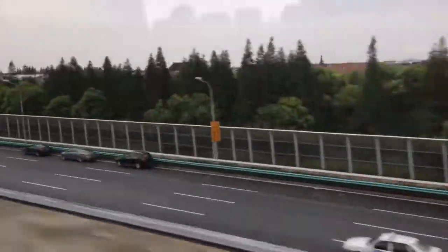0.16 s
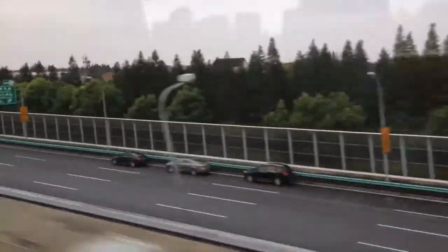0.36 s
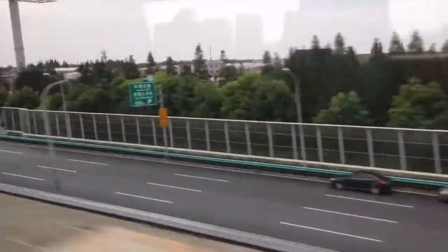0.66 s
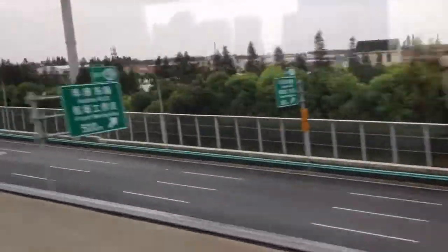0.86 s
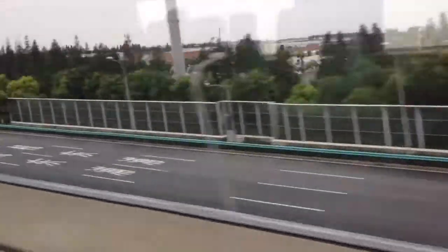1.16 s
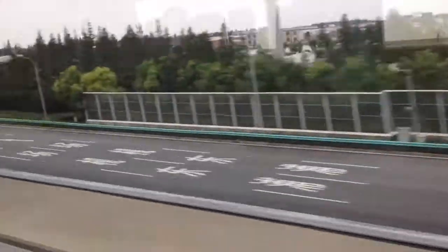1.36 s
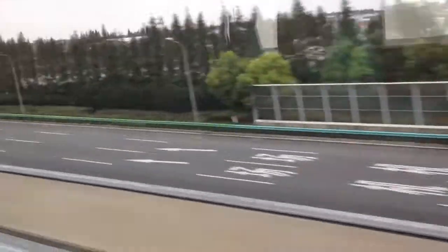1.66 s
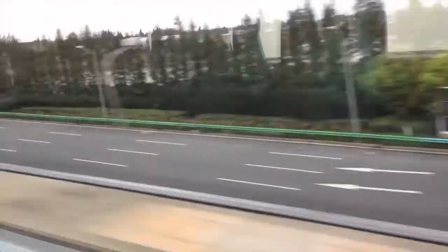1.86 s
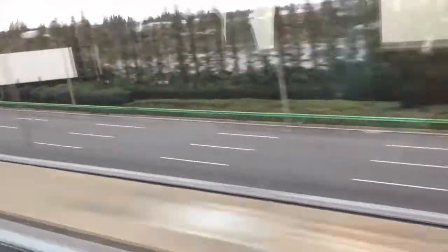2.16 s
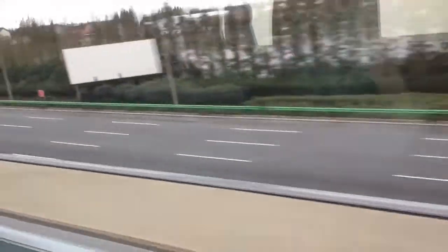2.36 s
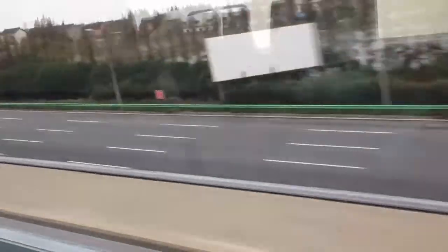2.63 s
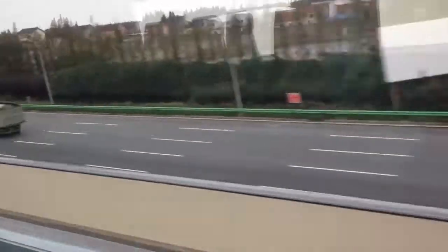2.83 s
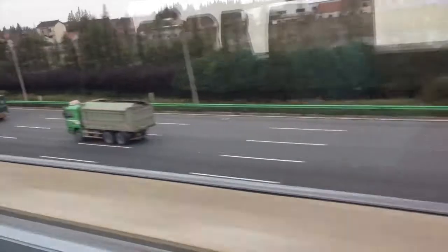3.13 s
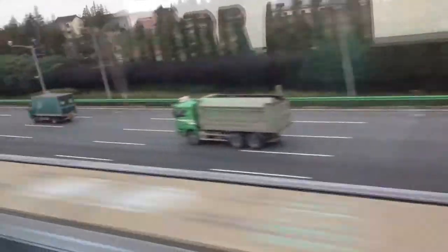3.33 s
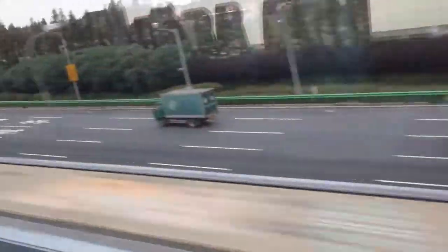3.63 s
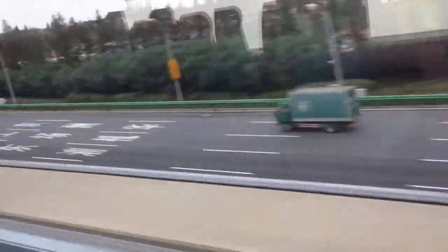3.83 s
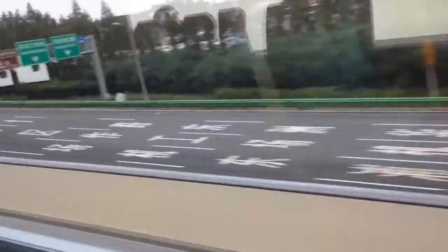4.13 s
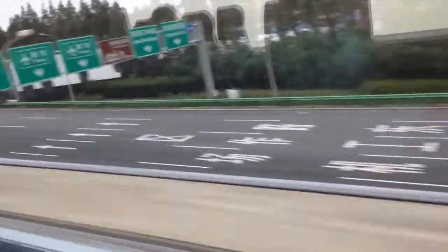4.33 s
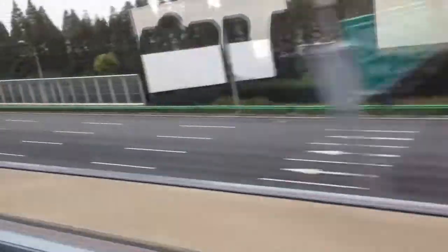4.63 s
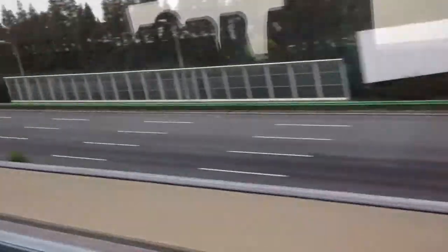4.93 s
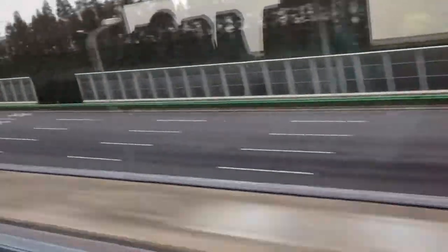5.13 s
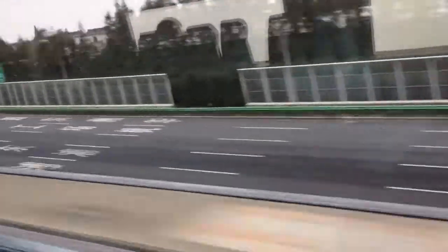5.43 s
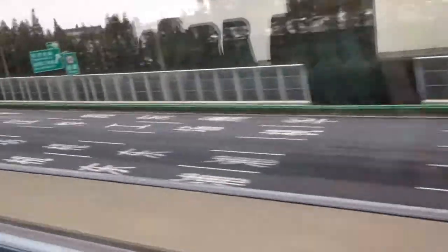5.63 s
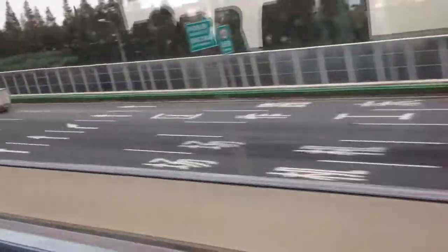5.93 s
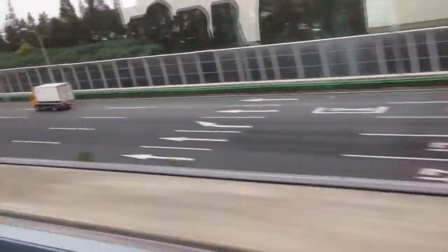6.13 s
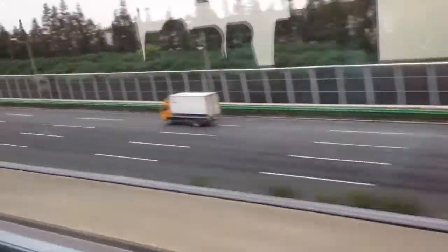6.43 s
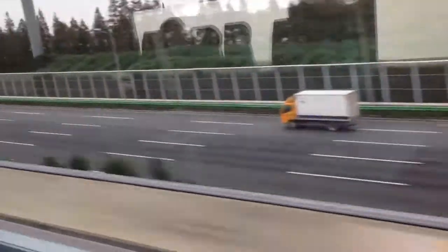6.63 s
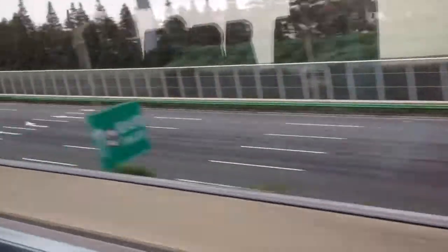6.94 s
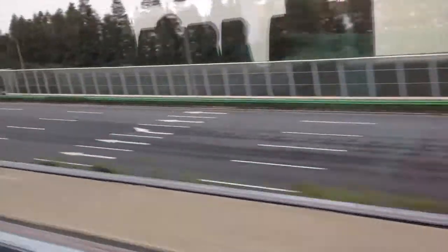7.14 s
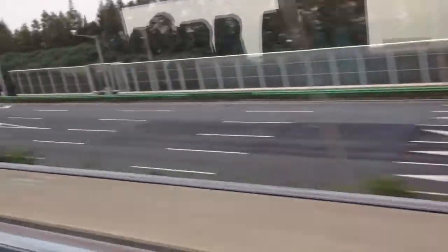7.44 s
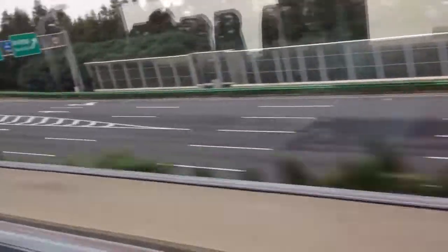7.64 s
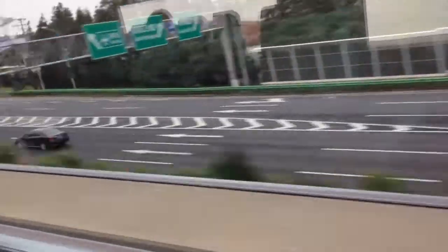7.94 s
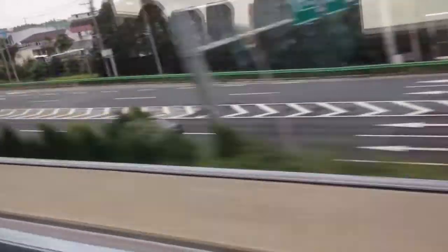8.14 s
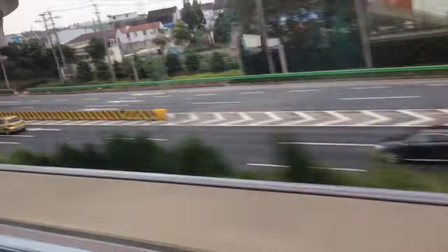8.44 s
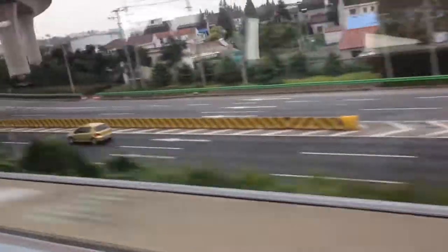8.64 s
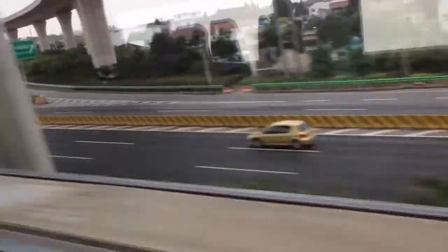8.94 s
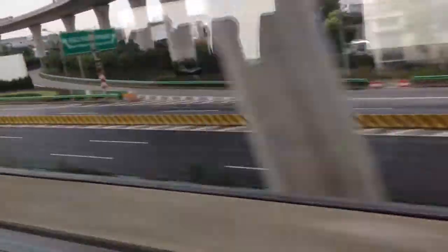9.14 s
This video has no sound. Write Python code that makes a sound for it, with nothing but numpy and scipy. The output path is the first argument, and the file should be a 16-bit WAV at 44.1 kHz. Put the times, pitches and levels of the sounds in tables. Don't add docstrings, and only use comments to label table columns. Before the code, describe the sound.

Inside a fast maglev train cabin, a deep lumpy rumble with soft thudding jolts, a dull rush of air and a faint wavering magnetic whine.

```python
import sys
import numpy as np
from scipy import signal
from scipy.fft import irfft, next_fast_len
from scipy.io import wavfile
from scipy.ndimage import uniform_filter1d

SR = 44100
rng = np.random.default_rng(int(sys.argv[2]) if len(sys.argv) > 2 else 0)


def pcm_store(signal):
    levels = np.round(np.clip(np.atleast_2d(signal), -1, 1) * 32767)
    wavfile.write(sys.argv[1], SR, levels.astype(np.int16).T)


def volts_from_decibels(level):
    exponent = np.asarray(level, float) / 20
    return 10 ** exponent


N = 409688
TIME = np.arange(N) / SR


def evened(x):
    return x / np.sqrt(np.mean(x ** 2) + 1e-20)


def add(mix, s, sound):
    part = mix[max(round(s * SR), 0):][:len(sound)]
    part += sound[:len(part)]


def bump(s, length):
    out = np.zeros(N)
    first = max(round((s - 1.5 * length) * SR), 0)
    last = max(round((s + 1.5 * length) * SR), 1)
    out[first:last] = np.exp(-(2 * (TIME[first:last] - s) / length) ** 2)
    return out


def noise(points, lo_hz, hi_hz, patchy_db, size=2048):
    hz = np.fft.rfftfreq(size, 1 / SR)
    a, b, patches = rng.standard_normal((4 * N // size + 5, len(hz), 3), dtype=np.float32).T
    patches = uniform_filter1d(patches, size=20, axis=0)
    patches = evened(uniform_filter1d(patches, size=8, axis=1))
    f, db = np.transpose(points)
    shape = volts_from_decibels(np.interp(np.log(hz + 1), np.log(f + 1), db))
    edges = np.sqrt(1 / (1 + (lo_hz / (hz + 1)) ** 8) / (1 + (hz / hi_hz) ** 8))
    z = (a + 1j * b) * (shape * edges)[:, None] * volts_from_decibels(patchy_db * patches)
    return evened(signal.istft(z, nperseg=size, noverlap=3 * size // 4)[1][:N])


def band(length, *modes):
    size = next_fast_len(length)
    f = np.fft.rfftfreq(size, 1 / SR)
    power = sum(volts_from_decibels(2 * db) / width / (1 + (2 * (f - hz) / width) ** 2) ** 2 for hz, width, db in modes)
    z = np.sqrt(power) * (rng.standard_normal((len(f), 2)) @ [1, 1j])
    rms = np.sqrt(sum(volts_from_decibels(2 * db) for hz, width, db in modes))
    return evened(irfft(z, size)[:length]) * rms


def steadied(x, seconds, share):
    width = round(seconds * SR)
    power = uniform_filter1d(uniform_filter1d(x ** 2, width), width)
    return evened(x / (abs(power) + 1e-3) ** (share / 2))


def self_noise():
    return band(N, (13500, 9000, -80))


# time in seconds, peak level in dB.
FITTING_TICKS = [(0.193, -54), (1.614, -54), (1.716, -57), (2.174, -57), (2.316, -51), (3.102, -52),
                 (4.436, -51), (5.157, -58), (5.221, -56), (5.313, -48.5), (5.907, -52.5), (6.087, -54),
                 (6.119, -62), (7.039, -62), (7.343, -55), (8.149, -55), (9.193, -54)]


def ticks():
    out, t = np.zeros(N), TIME[:6000]
    t60_s, rise_s = 0.1, 0.006
    for s, db in FITTING_TICKS:
        fade = volts_from_decibels(db - 8.5 - 60 * t / t60_s) * np.minimum(t / rise_s, 1)
        add(out, s, fade * band(len(t), (5000, 12000, 0)))
    return out


# middle in seconds, length in seconds, level in dB rms, centre in Hz, width in Hz.
CLOTH_RUSTLES = [(0.646, .4, -71, 4970, 2990), (1.653, .3, -76, 7960, 6000), (3.198, .2, -80, 8050, 4000),
                 (3.995, .045, -63, 4760, 2000), (5.228, .08, -71, 6500, 5000),
                 (5.844, .2, -65, 3780, 1200), (6.11, 0.065, -69, 5500, 6000),
                 (6.868, .012, -58, 3900, 700), (6.91, .12, -65, 4200, 1800), (6.894, .07, -73, 8000, 2980),
                 (7.06, .12, -68, 6500, 2200), (8.143, .07, -62.5, 5000, 3000),
                 (8.158, .06, -73, 9570, 7000), (9.195, .08, -71.5, 7060, 3000)]


def rustles():
    out = np.zeros(N)
    for s, length, db, hz, width in CLOTH_RUSTLES:
        count = round(2 * length * SR)
        wander = evened(uniform_filter1d(rng.standard_normal(SR), size=200))[:count]
        grain = evened(volts_from_decibels(3.2 * wander))
        swell = volts_from_decibels(db) * np.hanning(count)
        add(out, s - length, swell * grain * band(SR, (hz, width, 0))[:count])
    return out


PASS_HZ = 26.976
# multiple of PASS_HZ, level in dB rms.
TOOTH_TONES = [(3, -38.2), (6, -43.4), (13, -62.5), (14, -60.3), (15, -54.8), (16, -63.2), (19, -65.4),
               (21, -61.7), (25, -69.5), (26, -70.3), (27, -66.3), (28, -69.9), (30, -73.1), (31, -74.9),
               (32, -75.0), (33, -70.6), (34, -76.6), (39, -74.1), (42, -71.1), (45, -67.6), (46, -77.4),
               (47, -78.9), (48, -77.9), (49, -77.2), (51, -72.5), (55, -79.2), (63, -80.2), (108, -82.2)]


def tooth_comb():
    out, coarse = np.zeros(N), TIME[::1000]
    for k, db in TOOTH_TONES:
        start, slow, place = rng.random(3)
        sway_hz = 0.3 * slow + 0.15
        sway = volts_from_decibels(db + 2.0 * np.sin(2 * np.pi * (sway_hz * coarse + place)))
        level = np.interp(TIME, coarse, np.sqrt(2) * sway)
        out += level * np.sin(2 * np.pi * (k * PASS_HZ * TIME + start))
    return out


WHINE_TONES = (24, 36, 54, 72)
WHINE_QUIET_DB = (-66, -64, -70.5, -75.5)
# middle in seconds, length in seconds, lift in dB.
WHINE_LIFTS = [
    [(.7, 1.8, 11), (1.85, 0.59, 13.5), (5.2, .4, 9.5), (6.0, 0.45, 10.5), (7.5, .8, 7.5), (8.9, 0.86, 10)],
    [(.55, 0.62, 9.5), (1.05, 0.82, 13.5), (1.8, 0.65, 7), (3.5, 0.65, 6), (4.7, 0.36, 8), (6.3, .3, 5), (8.0, .5, 9.5), (8.8, 0.34, 6)],
    [(0.0, 0.49, 7.5), (.75, 0.45, 9), (2.7, 1.4, 7.5), (4.0, 1.25, 9), (5.3, 0.79, 4), (6.8, .5, 11.5), (7.65, .5, 9), (8.6, 1.3, 11.5)],
    [(.6, 0.99, 14), (2.45, .8, 10), (3.5, 0.71, 7.5), (4.8, .4, 11), (5.4, 0.96, 11.5), (7.55, .4, 9.5), (8.5, .8, 9)],
]
# noisy share from 0 to 1, width in Hz.
WHINE_SPREAD = ((0.25, 5.9), (0.2, 13), (0.1, 6.0), (.4, 16))


def whine():
    out = np.zeros(N)
    for k, rest_db, swells, (share, width_hz) in zip(WHINE_TONES, WHINE_QUIET_DB, WHINE_LIFTS, WHINE_SPREAD):
        db = rest_db + sum(lift_db * bump(s, length) for s, length, lift_db in swells)
        tone = np.sqrt(2) * np.sin(2 * np.pi * (k * PASS_HZ * TIME + rng.random()))
        blur = band(N, (k * PASS_HZ, width_hz, 0))
        out += volts_from_decibels(db) * (np.sqrt(1 - share) * tone + np.sqrt(share) * blur)
    return out


# time in seconds, drop in dB, recovery in seconds.
GAIN_DROPS = [(2.05, -3, 1.2), (3.3, -0.2, .7), (6.41, -1.5, 1.4), (7.5, -.7, 0.54), (8.35, -0.5, .5)]


def ducking():
    out, fall_s = np.zeros(N), 0.045
    for s, db, recovery in GAIN_DROPS:
        since = np.maximum(TIME - s, 0)
        out += db * (1 - np.exp(-since / fall_s)) * np.exp(-since / recovery)
    return out


# pitch in Hz, level in dB per Hz.
ROAR_COLOUR = [(120, -36), (200, 0.5), (251, -6.5), (338, -10.5), (431, -18), (628, -20.5), (834, -27.5),
               (980, -24.5), (1120, -29), (1430, -31), (1610, -34), (1920, -37), (2080, -37), (3430, -41),
               (5000, -54.5), (6500, -80.5), (11000, -120)]
# pitch in Hz, level in dB per Hz.
HISS_COLOUR = [(2060, -30.5), (3500, 0.5), (8240, -18), (14700, -25), (15600, -24.5)]
# pitch in Hz, width in Hz, level in dB rms.
RINGING_BANDS = [(600, 60, -60), (968, 90, -60.5), (1442, 63, -63.5), (1930, 21, -69.5), (2180, 8, -80),
                 (2423, 110, -70), (2710, 90, -73), (2904, 16, -78), (3156, 65, -73.5), (3470, 9.2, -83),
                 (3480, 240, -73.5), (3910, 14, -81)]


def flow():
    duck_db = ducking()
    low_duck_db, high_duck_db = 0.74 * duck_db, 0.9 * duck_db
    roar = volts_from_decibels(-37.5 + low_duck_db) * noise(ROAR_COLOUR, 254.5, 4200, 1.24)
    hiss = volts_from_decibels(-64.5 + high_duck_db) * noise(HISS_COLOUR, 4120, 21000, 1.0, size=1024)
    panels = volts_from_decibels(1.0 + low_duck_db) * band(N, *RINGING_BANDS)
    return roar + hiss + panels + volts_from_decibels(high_duck_db) * self_noise()


# middle in seconds, length in seconds, lift in dB, centre in Hz.
RUMBLE_GUSTS = [(0.02, 0.06, 8, 80), (0.37, 0.043, 2, 80), (0.48, 0.056, 10, 203), (1.13, 0.09, 4, 122),
                (2.04, 0.046, 2, 80), (2.56, 0.051, 5, 95), (3.03, 0.036, 5, 95), (3.77, 0.056, 7, 50),
                (4.03, 0.067, 6, 150), (4.25, 0.074, 1, 80.5), (4.55, 0.043, 6.1, 150),
                (4.84, 0.09, 6.5, 50), (4.99, 0.032, 11, 50), (5.18, 0.071, 6.5, 80),
                (5.29, 0.087, 2.7, 122), (5.52, 0.048, 7, 94), (6.01, 0.05, 1, 50), (6.07, 0.21, 6.5, 94.5),
                (6.4, 0.046, 5, 80), (6.49, 0.13, 5, 149), (6.71, 0.053, 4.3, 95), (6.83, 0.06, 10, 50),
                (6.92, 0.15, 4, 95), (7.35, 0.039, 4.2, 66), (7.47, 0.09, 6.5, 79.5), (7.86, 0.031, 1, 95),
                (8.32, 0.054, 5.5, 205), (8.75, 0.055, 4.5, 150), (8.91, 0.2, 5, 94.5),
                (9.13, 0.046, 7, 95)]
# middle in seconds, length in seconds, drop in dB (negative), centre in Hz.
RUMBLE_LULLS = [(0.2, 0.25, -5, 80), (0.31, 0.06, -6, 150), (0.46, 0.09, -3, 50), (0.61, 0.11, -10, 50),
                (1.06, 0.071, -12, 50.3), (1.37, 0.15, -7, 122), (1.72, 0.055, -9, 95),
                (2.23, 0.3, -6.5, 150), (2.44, 0.073, -14, 66), (2.76, 0.072, -13, 81),
                (3.15, 0.071, -2, 50), (3.31, 0.07, -6, 95), (3.46, 0.084, -7, 95), (3.85, 0.065, -7.5, 95),
                (4.4, 0.12, -6, 122), (5.07, 0.056, -9, 80), (5.27, 0.09, -6, 50), (5.46, 0.053, -8, 50),
                (5.72, 0.45, -1.5, 50), (5.9, 0.06, -4.7, 66), (6.24, 0.06, -6.9, 50),
                (6.48, 0.09, -5.8, 50), (6.61, 0.044, -8, 95), (6.78, 0.064, -7.5, 122),
                (7.21, 0.14, -2, 122), (7.57, 0.09, -4.5, 95), (7.98, 0.19, -9.5, 50),
                (8.4, 0.053, -5.3, 121), (8.61, 0.072, -15, 66), (9.22, 0.065, -5.5, 121)]


def buffeting(layer_hz, rest_db):
    reach_octaves, strength = 0.63, 1.01
    db = np.zeros(N)
    for s, length, change_db, hz in list(RUMBLE_GUSTS) + list(RUMBLE_LULLS):
        nearness = np.exp(-(np.log2(hz / layer_hz) / reach_octaves) ** 2)
        db += change_db * nearness * bump(s, length)
    return rest_db + strength * db


# middle in seconds, peak level in dB, pitch in Hz, number of cycles.
SHELL_JOLTS = [(0.018, -10.5, 85, 1.8), (0.379, -9.5, 80, 2), (1.95, -12, 88, 1.5), (2.037, -6, 92, 1.6),
               (3.033, -11.5, 89, 1.8), (3.245, -12, 88, 1.9), (3.552, -11, 96, 2.3),
               (3.7, -21.5, 198, 5.7), (4.249, -6, 97, 1.8), (4.55, -8, 99, 1.4), (4.71, -10, 85, 2.4),
               (4.992, -10, 70, 1.7), (6.002, -7, 93, 1.9), (6.09, -6.5, 99, 2.6), (6.393, -6, 82, 2.2),
               (6.833, -8, 71.4, 2.5), (6.927, -9, 93, 2.5), (7.353, -8.5, 88, 1.7), (7.486, -8.5, 90, 1.4),
               (7.861, -5.5, 85.5, 1.1), (8.528, -12, 91, 1.9), (8.918, -7.5, 92, 2.3)]


def jolted(rumble):
    out = rumble.copy()
    for s, db, hz, cycles in SHELL_JOLTS:
        near = slice(max(round(s * SR) - SR // 10, 0), round(s * SR) + SR // 10)
        turns = hz * (TIME[near] - s)
        bell = np.exp(-(2.85 * turns / cycles) ** 2)
        out[near] = out[near] * (1 - 0.32 * bell) + volts_from_decibels(db) * bell * np.cos(2 * np.pi * turns)
    return out


# pitch in Hz, level in dB per Hz.
THUD_COLOUR = [(11, -49.5), (18, -24.5), (59, 6.5), (110, 3), (140, -27.5), (240, -120)]
# pitch in Hz, level in dB per Hz.
BOOM_COLOUR = [(47, -27.5), (80, -1), (136, -4.5), (252, -18.5), (320, -21), (420, -54.5), (700, -120)]
# centre in Hz, resting level in dB rms.
RUMBLE_LAYERS = [
    (66, -24.5),
    (122, -24.5),
    (205, -32),
]


def shell():
    thud_db, boom_db, drum_db = (buffeting(*layer) for layer in RUMBLE_LAYERS)
    thud = steadied(noise(THUD_COLOUR, 12, 92, 0.1, size=8192), 0.077, 0.81)
    boom = steadied(noise(BOOM_COLOUR, 96, 160, 0.1, size=8192), 0.071, 0.7)
    drum = steadied(noise(BOOM_COLOUR, 187, 212, 0.1, size=8192), 0.089, 0.57)
    rumble = volts_from_decibels(thud_db) * thud + volts_from_decibels(boom_db) * boom + volts_from_decibels(drum_db) * drum
    shake_db = 1.38 * band(N, (13.0, 12.0, 0)) + 0.35
    return jolted(rumble * volts_from_decibels(shake_db))


def scene():
    return (ticks() + rustles() + tooth_comb() + whine() + flow() + shell())[None]


def roll_off(x):
    return signal.sosfilt(signal.butter(12, 15770, fs=SR, output="sos"), x)


def record(dry):
    bass_cut = signal.butter(3, 37.0, "highpass", fs=SR, output="sos")
    cut = signal.sosfilt(bass_cut, dry)
    to_nearest_end = np.minimum(TIME, TIME[::-1] + 0.0005)
    faded = cut * np.minimum(to_nearest_end / 0.003, 1)
    treble_cut = signal.firwin(2001, 15300, window=("kaiser", 7), fs=SR)
    mix = signal.oaconvolve(faded, treble_cut[None], "same")
    return roll_off(mix)


dry = scene()
out = record(dry)
pcm_store(out)
```